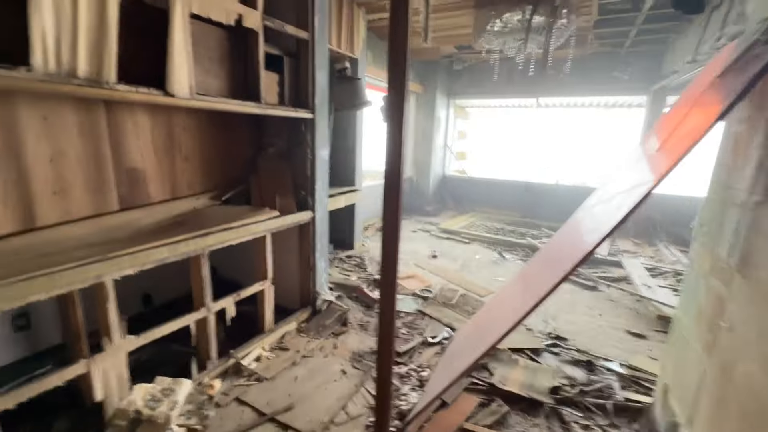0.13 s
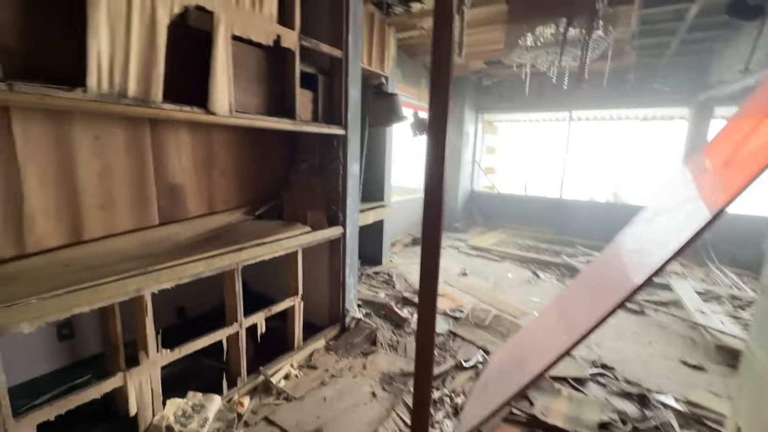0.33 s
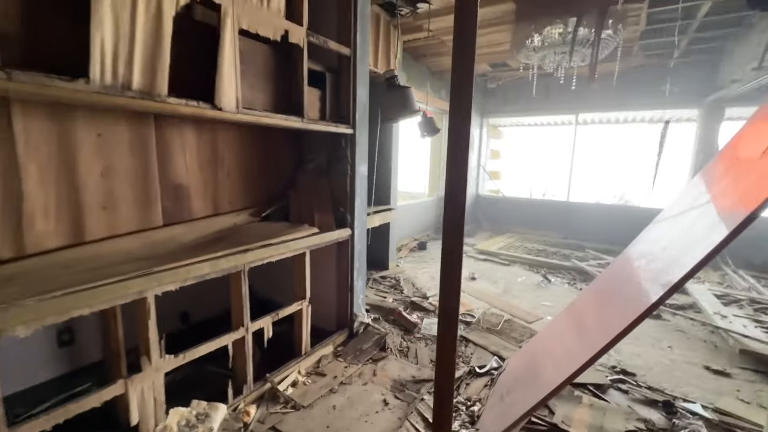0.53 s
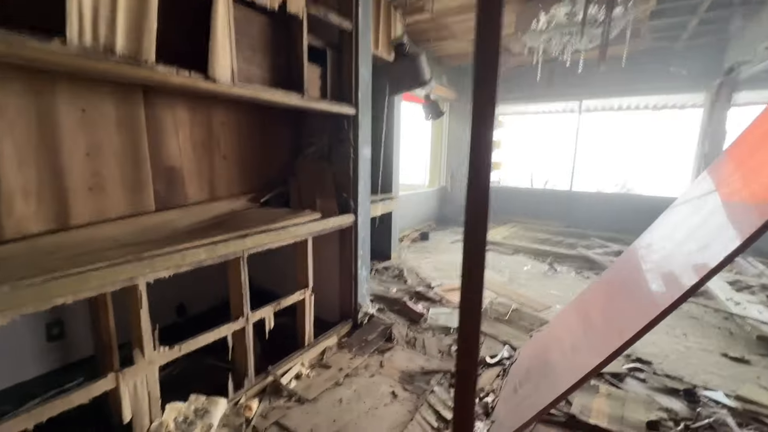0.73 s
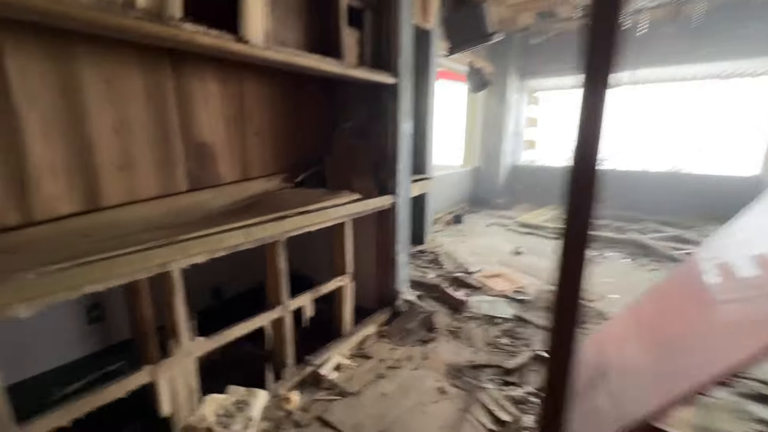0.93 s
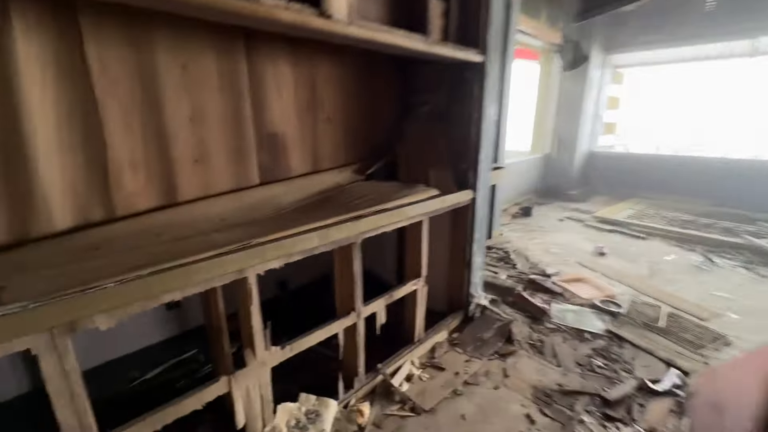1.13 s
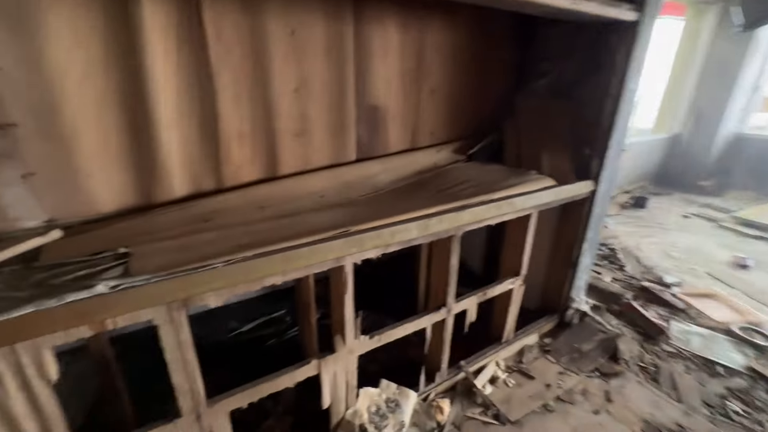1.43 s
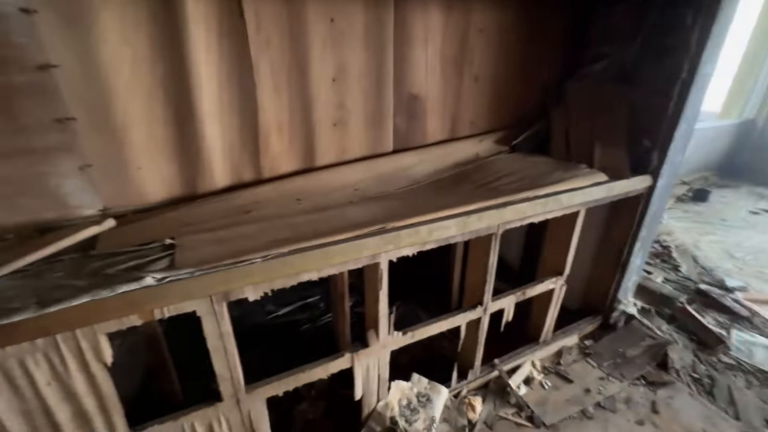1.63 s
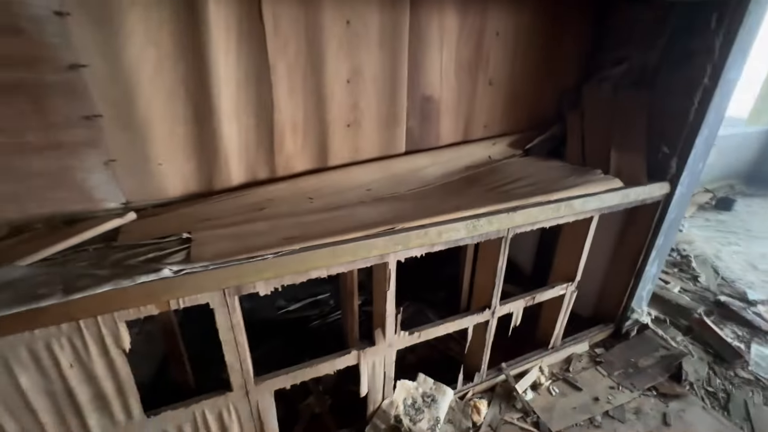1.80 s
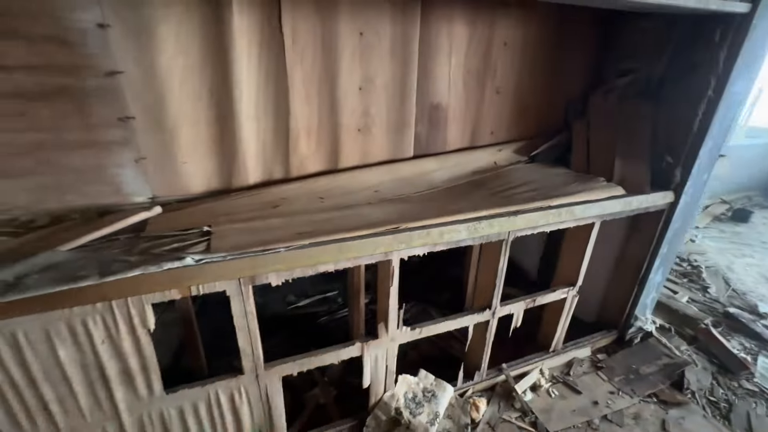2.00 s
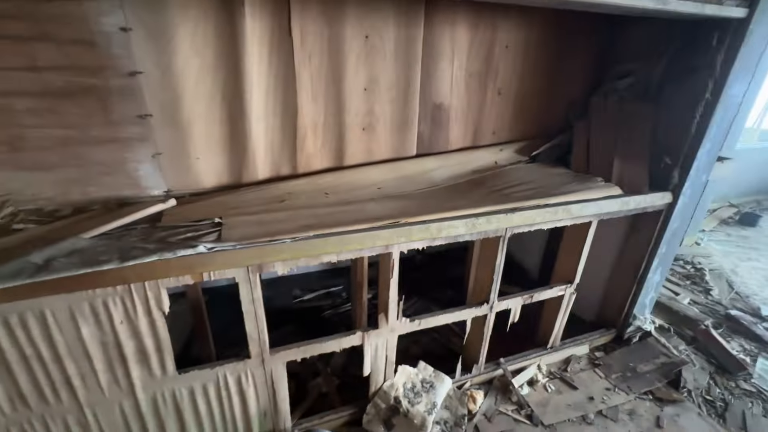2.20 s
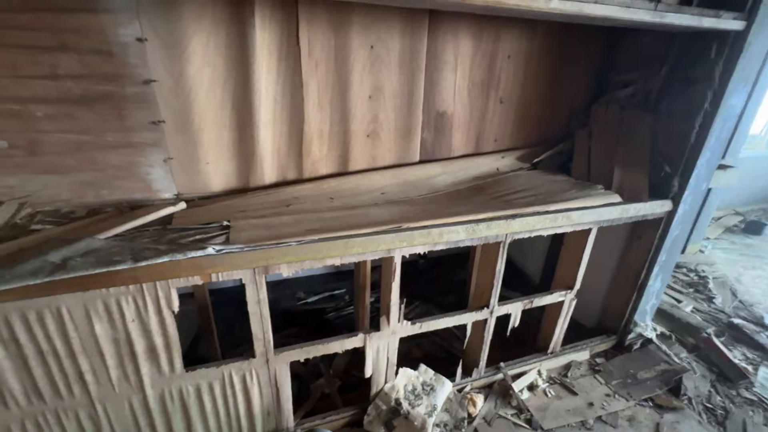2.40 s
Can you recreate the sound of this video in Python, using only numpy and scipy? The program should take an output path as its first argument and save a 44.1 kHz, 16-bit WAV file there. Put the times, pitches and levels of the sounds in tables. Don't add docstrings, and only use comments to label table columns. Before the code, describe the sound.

Footsteps over loose boards and plaster debris, close to the microphone: a sharp snap, light ticks, then wooden knocks and a dense crunching clatter, with short echoes in a bare building and faint traffic outside.

```python
import sys
import numpy as np
from scipy import signal
from scipy.fft import rfft, irfft, next_fast_len
from scipy.io import wavfile
from scipy.ndimage import uniform_filter1d

SR = 44100
rng = np.random.default_rng(int(sys.argv[2]) if len(sys.argv) > 2 else 0)


def wav_out(sig):
    wavfile.write(sys.argv[1], SR, np.round(np.clip(np.atleast_2d(sig).T, -1, 1) * 32767).astype(np.int16))


def gain_from_db(level_db):
    decades = np.asarray(level_db, float) / 20
    return 10 ** decades


N = 112454

# frequency in Hz, density in dB per Hz.
TRAFFIC_SPECTRUM = [(25, -7), (70, 0), (230, -11), (1500, -19.5), (2400, -23), (9500, -46), (11500, -59),
                    (16000, -68)]
# time in seconds, level in dB.
ENGINE_LEVEL = [(0.0, -54), (0.03, -54.5), (0.52, -77), (0.89, -48.5), (1.44, -90), (1.52, -46),
                (1.71, -42), (1.78, -40), (1.81, -60), (2.55, -74.5)]
# frequency in Hz, density in dB per Hz.
ENGINE_SPECTRUM = [(40, -30), (58, -5), (71, 0), (85, -5), (120, -30)]
# time in seconds, level in dB.
SCUFF_LEVEL = [(0, -58.5), (.12, -52.5), (.24, -55.5), (.29, -65), (.5, -60), (.7, -70), (.9, -55),
               (1.1, -64), (1.18, -61), (1.28, -54.5), (1.45, -66.5), (2.25, -84), (2.55, -88)]
# frequency in Hz, density in dB per Hz.
SCUFF_SPECTRUM = [(500, -11), (1500, 2.5), (4000, -1.5), (10000, -3.5), (11500, -9), (16000, -7)]
# start in seconds, length in seconds, level in dB, grain pitch in Hz.
CRUNCHES = [(.02, 0.19, -47.5, 350), (.85, 0.29, -48, 396), (0.759, 0.029, -32.5, 2500),
            (0.99, 0.08, -49, 6700), (1.8505, 0.00205, -9, 1760), (2.015, 0.054, -30.5, 1930),
            (2.168, 0.031, -40, 1110), (1.514, 0.039, -32, 1300), (1.545, 0.038, -40, 9700),
            (1.615, 0.02, -39.5, 9600), (1.644, .03, -42, 9200), (1.699, 0.033, -41.5, 4630),
            (1.734, 0.014, -12.5, 2500), (1.742, 0.018, -16.5, 2240), (1.826, 0.023, -25, 4780),
            (1.853, 0.025, -16, 5250), (1.876, 0.033, -19, 6140), (1.963, 0.021, -27, 6500),
            (2.012, .018, -20, 5100), (2.017, 0.01, -19.5, 11100), (2.053, 0.042, -33, 7250),
            (2.121, 0.022, -35.5, 4000), (2.17, 0.016, -36, 6500), (2.337, 0.016, -47.5, 7100)]
# start in seconds, peak in dB, pitch in Hz, bandwidth over pitch,
# rattle decay in seconds.
SNAPS = [(.738, -39, 4500, 0.59, 0.012), (0.7552, -6.5, 9500, 0.41, 0.0057),
         (0.759, -11.5, 7540, 0.33, 0.0022), (0.928, -11.5, 6300, 0.38, 0.0078),
         (.9935, -12.5, 10500, 2.4, 0.014), (1.067, -31, 10100, 1.1, .003),
         (1.834, -8.5, 2500, 0.59, 0.0052), (1.851, 2, 1760, 0.3, 0.0062), (1.968, -15, 2310, 3.3, 0.024),
         (2.122, -24, 1910, 0.47, 0.0054), (2.1695, -13, 2100, 0.23, 0.013),
         (2.3411, -27, 2320, 0.23, 0.013)]
# start in seconds, peak in dB, blow length in seconds,
# board pitch in Hz, floor boom in dB.
KNOCKS = [(.739, -36, 0.0015, 690, 16), (.7545, -12, 0.00096, 563, 3.5), (1.128, -40.5, 0.0028, 367, 7),
          (1.5105, -19, 0.00089, 480, 2), (1.52, -16.5, 0.002, 503, 14), (1.557, -21, 0.0017, 525, 13),
          (1.634, -28.5, 0.0086, 486, -1), (1.742, 0.5, 0.0041, 504.2, 5), (1.755, -5, 0.0018, 503, 0),
          (1.836, -18, 0.0034, 495, 11), (1.878, -9, 0.0034, 544.2, 10), (1.893, -15, 0.0044, 597, 10),
          (2.021, -7, 0.002, 556.6, -1), (2.066, -30, 0.004, 556, 9)]
# multiple of the board pitch, level in dB, 60 dB decay in seconds.
BOARD_MODES = [(.62, -8, 0.1), (.83, -12, 0.055), (.92, -1, 0.096), (1.01, -0.5, 0.08), (1.16, -6.5, 0.076),
               (1.38, -3.5, 0.083), (1.52, -7.5, 0.09), (1.68, -7, 0.091), (1.82, -7.5, 0.064),
               (2, -9, 0.058), (2.4, -4, 0.048), (2.95, -10, 0.044), (3.5, -10, 0.058), (4.1, -6.5, 0.062)]
# delay in seconds, level in dB.
ECHOES = [(.003, -10.5), (.006, -22.5), (.013, -12), (0.023, -21.5)]
# frequency in Hz, 60 dB decay in seconds.
ROOM_DECAY = [(150, 0.47), (300, 0.38), (600, 0.28), (2800, 0.18), (7000, 0.17), (14000, 0.2)]
# frequency in Hz, gain in dB.
MICROPHONE = [(30, -47), (60, -2.5), (150, -2.5), (9000, 1.5), (11500, 0), (15000, -5.5)]


def unit(x):
    return x / np.sqrt(np.mean(x ** 2) + 1e-20)


def along(points, hz):
    f, value = np.transpose(points)
    return np.interp(np.log(hz + 1), np.log(f + 1), value)


def level(rows):
    s, db = np.transpose(rows)
    return gain_from_db(np.interp(np.arange(N) / SR, s, db))


def filtered(x, response):
    size = next_fast_len(len(x) + 8192)
    spectrum = rfft(x, size) * response(np.fft.rfftfreq(size, 1 / SR))
    return irfft(spectrum, size)[:len(x)]


def resonance(f, hz, width_hz):
    return 1j * f * width_hz / (hz * hz - f * f + 1j * f * width_hz)


def add(track, s, peak_db, sound):
    part = track[round(s * SR):][:len(sound)]
    part += gain_from_db(peak_db) * sound[:len(part)] / np.abs(sound).max()


def rush(spectrum, patchy_db):
    z = signal.stft(rng.standard_normal(N), nperseg=512)[2]
    patches = uniform_filter1d(rng.standard_normal(z.shape), size=5, axis=0)
    patches = uniform_filter1d(patches, size=10, axis=1)
    noise = signal.istft(z * gain_from_db(patchy_db * unit(patches)), nperseg=512)[1][:N]
    return unit(filtered(noise, lambda hz: gain_from_db(along(spectrum, hz))))


def far_traffic():
    patchy_db = 0.8
    wash = gain_from_db(-50) * rush(TRAFFIC_SPECTRUM, patchy_db)
    engine = level(ENGINE_LEVEL) * rush(ENGINE_SPECTRUM, patchy_db)
    return wash + engine


def scuff():
    return level(SCUFF_LEVEL) * rush(SCUFF_SPECTRUM, patchy_db=1)


def crunch(count=600, size=128, clumps=12):
    rise_s, t60_s, clump_s = 0.0016, 0.04, 0.004
    pitch_spread, scatter_db, ring_cycles = 0.72, 2.5, 1.4
    out, k = np.zeros(N), np.arange(size)
    for s, length, db, hz in CRUNCHES:
        clump = rng.integers(clumps, size=(count, 1))
        late = rng.exponential(size=(count, 1))
        pitch = rng.standard_normal((count, 1))
        big = rng.exponential(size=(count, 1))
        start = length * rng.random(clumps)[clump] + clump_s * rng.random((count, 1))
        start = start + late * t60_s / np.log(1000)
        cycles = np.clip(hz * np.exp(pitch_spread * pitch), 250, 15500) * k / SR
        gain = gain_from_db(scatter_db * big) * (1 - np.exp(-start / rise_s))
        grains = gain * np.sin(2 * np.pi * cycles) * np.exp(-cycles / ring_cycles * 2)
        index = np.round((s + start) * SR).astype(int) + k
        cloud = np.bincount(index.ravel(), grains.ravel(), N)[:N]
        out += gain_from_db(db) * cloud / np.sqrt((cloud ** 2).sum() / (length * SR))
    return filtered(out, lambda f: (1j * f / (180 + 1j * f)) ** 2)


def snaps():
    rattle_db, broad_db = -32.5, -12
    out, t = np.zeros(N), np.arange(SR // 8) / SR
    for s, peak_db, hz, width, rattle_s in SNAPS:
        clicks = gain_from_db(rattle_db) * rng.standard_normal(len(t)) ** 3 * np.exp(-t / rattle_s)
        clicks[0] += 1

        def bit(f):
            return resonance(f, hz, width * hz) + gain_from_db(broad_db) * resonance(f, 3300, 18000)

        add(out, s, peak_db, filtered(clicks, bit))
    return out


def knocks():
    detune, scatter_db, rough = 0.028, 2, 0.5
    grit_db, grit_hz, grit_width_hz = -9, 1300, 2500
    boom_hz, boom_t60_s, boom_rise_s, floor_db = 169.75, 0.21, 0.0027, -21
    out, t = np.zeros(N), np.arange(SR // 4) / SR
    ratio, db, t60 = np.transpose(BOARD_MODES)[:, :, None]
    boom = np.sin(2 * np.pi * boom_hz * t) * gain_from_db(-60 * t / boom_t60_s)
    boom = boom * (1 - np.exp(-t / boom_rise_s))
    for s, peak_db, length, hz, boom_db in KNOCKS:
        u = t / length
        off, size, phase = rng.standard_normal((3, *db.shape))
        steps = rng.standard_normal((len(db), len(t) // 256 + 1))
        chatter = 1 + rough * np.repeat(steps, 256, axis=1)[:, :len(t)]
        chatter = uniform_filter1d(chatter, size=256)
        fall = gain_from_db(db + scatter_db * size - 60 * t / t60)
        modes = chatter * fall * np.sin(2 * np.pi * (hz * ratio * (1 + detune * off) * t + phase))
        add(out, s, peak_db, modes.sum(0) * (1 - np.exp(-u ** 2)))
        grit = u * np.exp(-u) * rng.standard_normal(len(t))
        grit = filtered(grit, lambda f: resonance(f, grit_hz, grit_width_hz) ** 2)
        add(out, s, peak_db + grit_db, grit)
        add(out, s, peak_db + floor_db + boom_db, boom)
    return out


def room(x, places=16):
    room_db, onset_s, long_db, long_stretch = -5, 0.0077, -36, 1.93
    out = x.copy()
    for delay, db in ECHOES:
        out += gain_from_db(db) * np.pad(x, (round(delay * SR), 0))[:N]
    place = np.arange(N) * places / N
    for k in range(places + 1):
        hz, t, z = signal.stft(rng.standard_normal(SR // 2), SR, nperseg=256)
        fall = -60 * t / along(ROOM_DECAY, hz)[:, None]
        decay = gain_from_db(fall) + gain_from_db(long_db + fall / long_stretch)
        tail = signal.istft(z * decay, SR, nperseg=256)[1]
        tail = tail * (1 - np.exp(-(np.arange(len(tail)) / SR / onset_s) ** 2))
        share = np.clip(1 - abs(place - k), 0, 1)
        out += gain_from_db(room_db) * signal.fftconvolve(x * share, tail / np.linalg.norm(tail))[:N]
    return out


def scene():
    background = far_traffic() + scuff()
    debris = crunch() + snaps()
    boards = gain_from_db(1) * knocks()
    wet = gain_from_db(-5)
    return (room(wet * boards + debris) + (1 - wet) * boards + background)[None]


def roll_off(x):
    return signal.sosfilt(signal.butter(12, 16810, fs=SR, output="sos"), x)


def record(dry):
    top_hz, edge_hz, edge_db = 15850, 16800, -36
    x = filtered(dry[0], lambda hz: gain_from_db(along(MICROPHONE, hz)))
    x = x / (1 + abs(x) ** 8) ** (1 / 8)
    x = filtered(x, lambda hz: np.where(hz < top_hz, 1, gain_from_db(edge_db) * (hz < edge_hz)))
    return roll_off(x[None])


dry = scene()
out = record(dry)
wav_out(out)
```